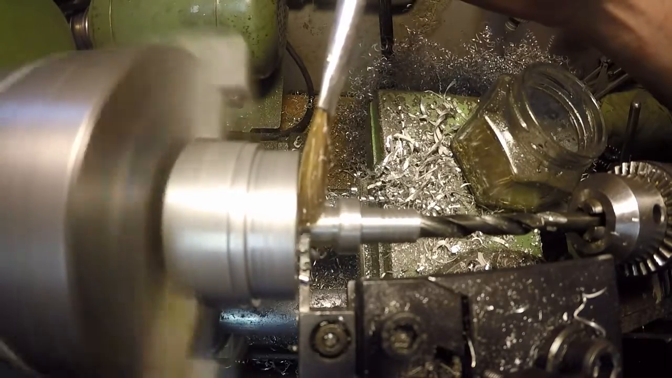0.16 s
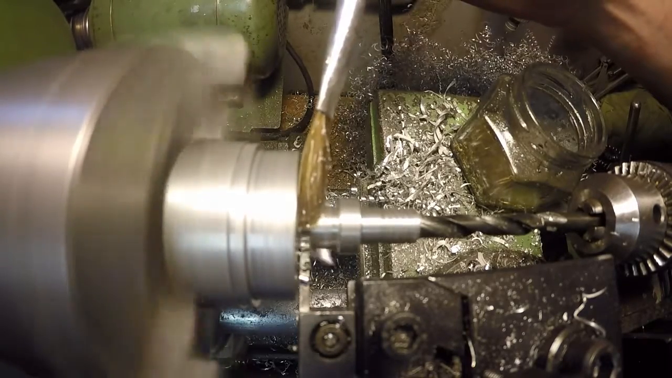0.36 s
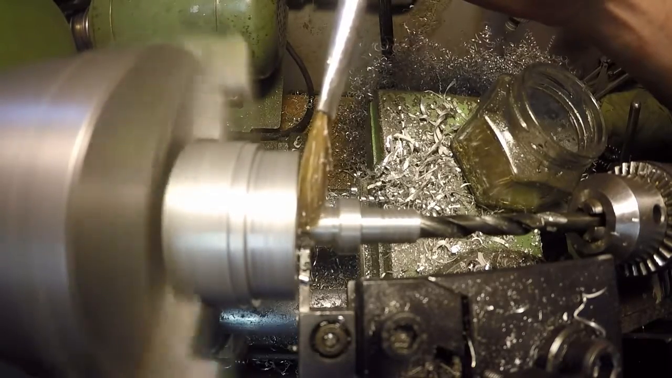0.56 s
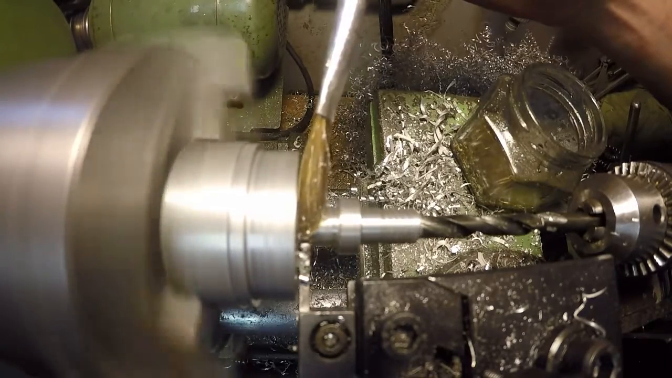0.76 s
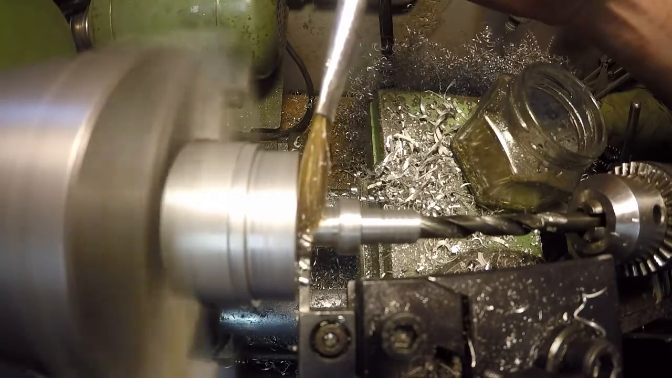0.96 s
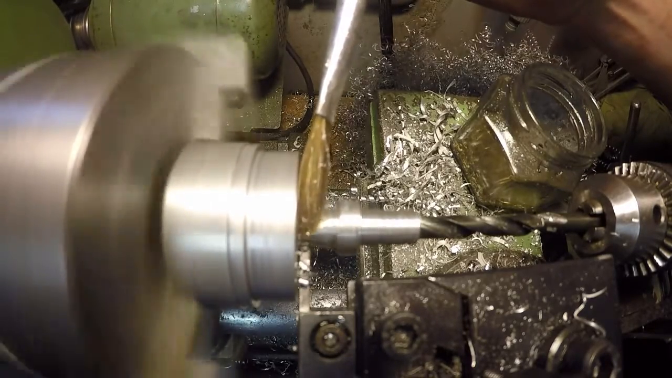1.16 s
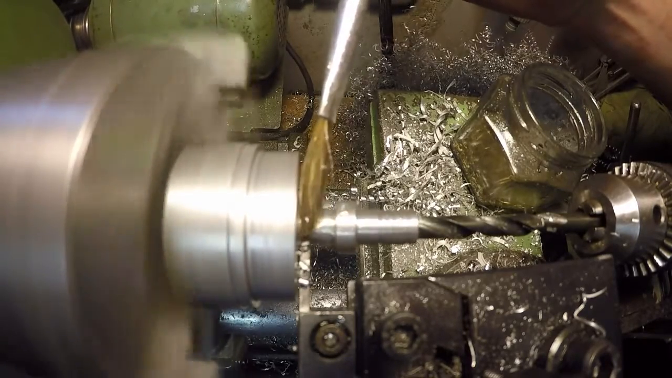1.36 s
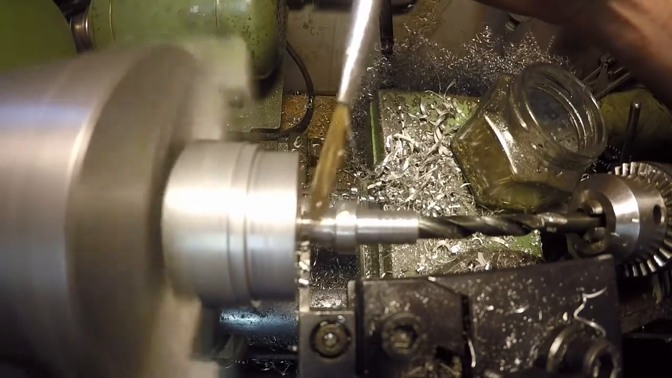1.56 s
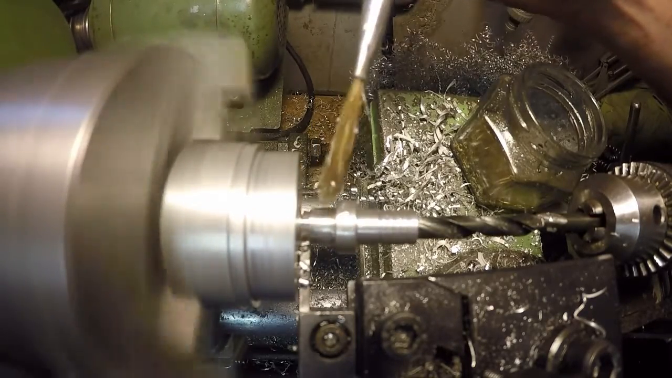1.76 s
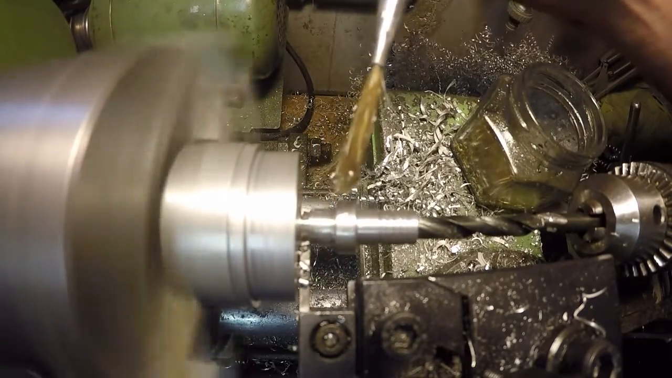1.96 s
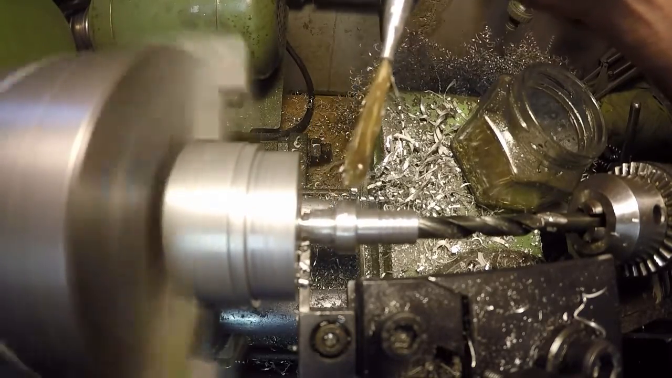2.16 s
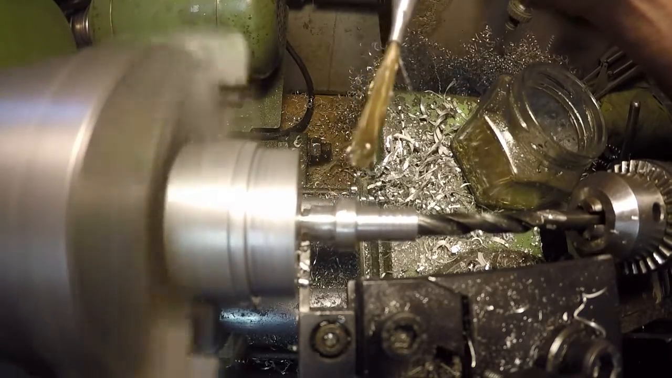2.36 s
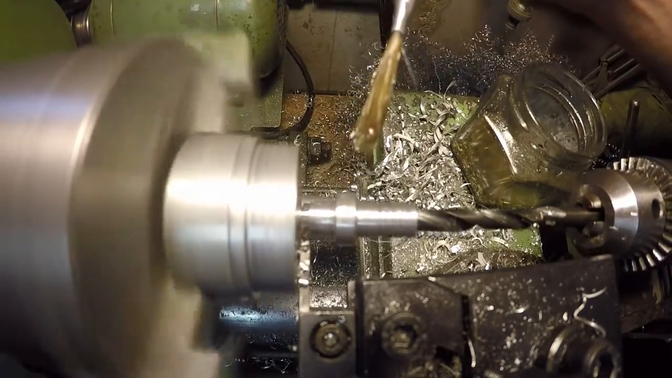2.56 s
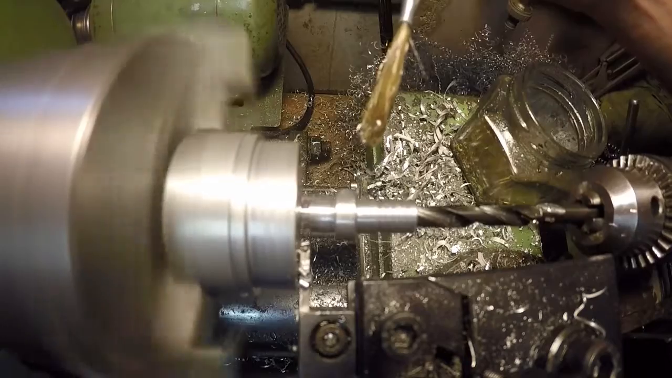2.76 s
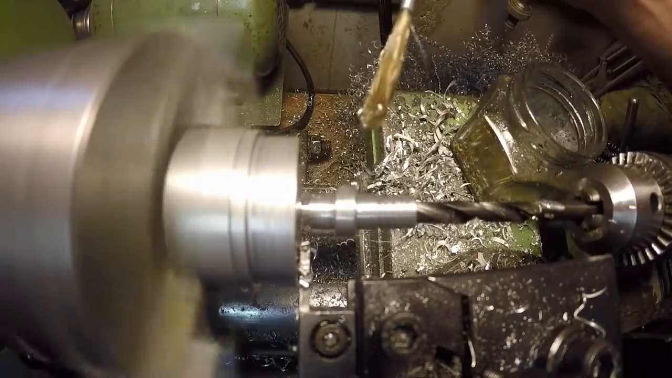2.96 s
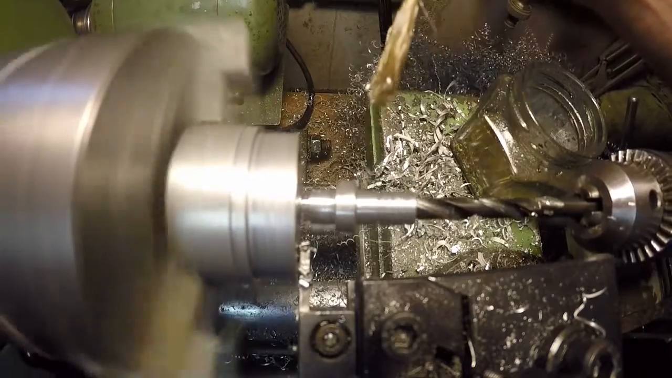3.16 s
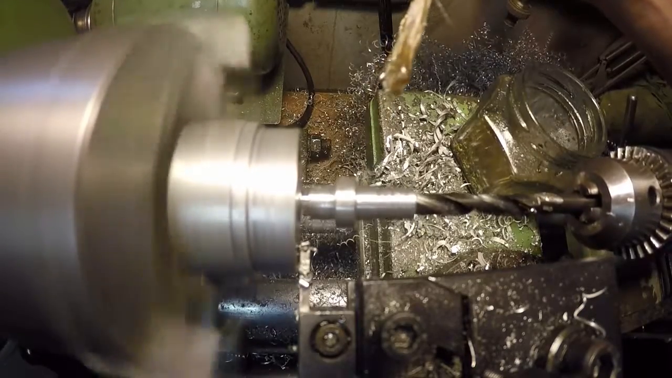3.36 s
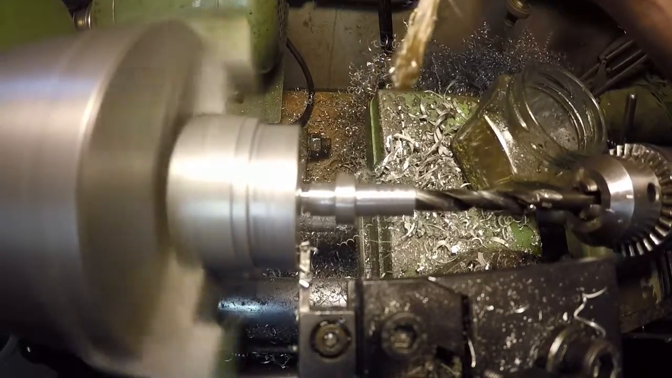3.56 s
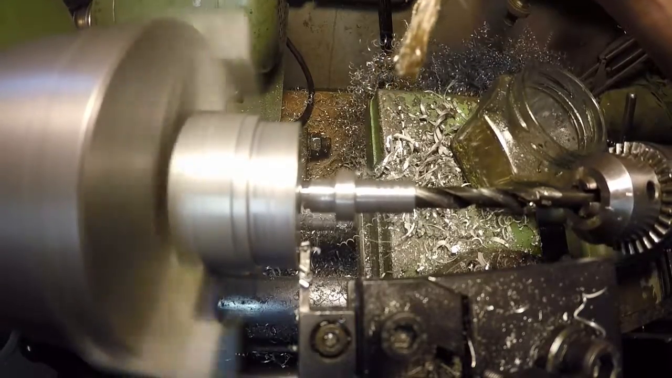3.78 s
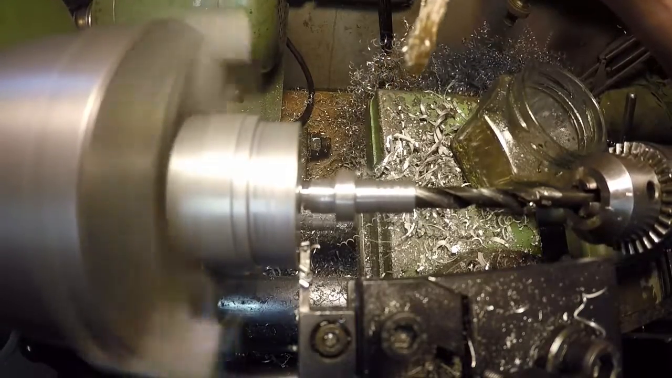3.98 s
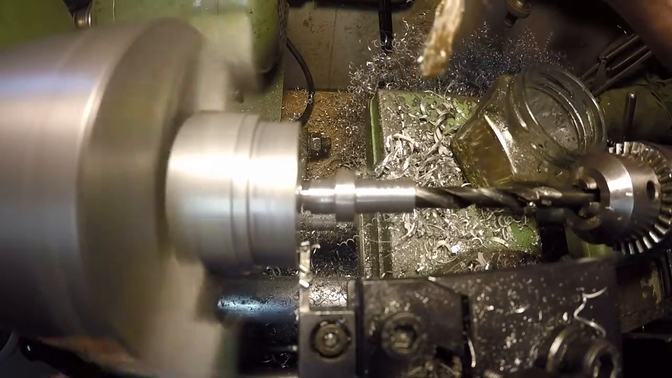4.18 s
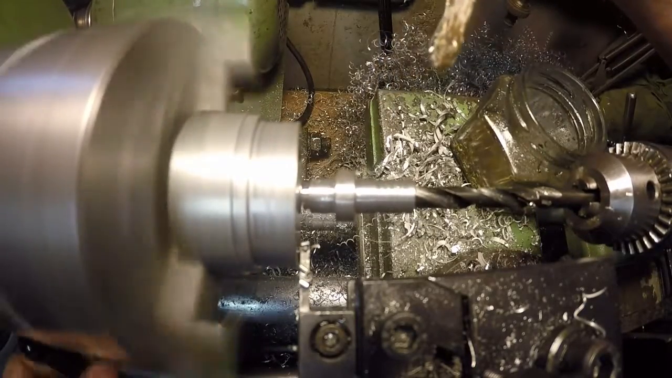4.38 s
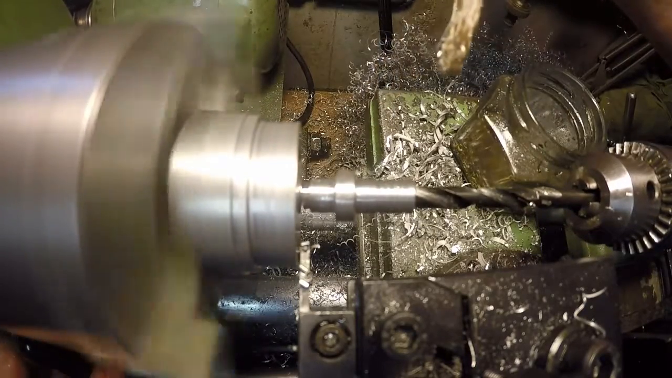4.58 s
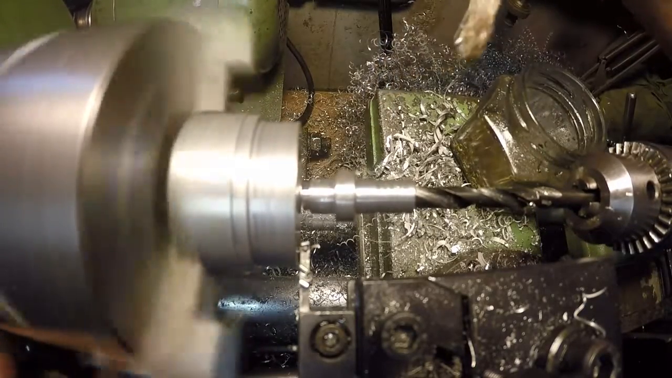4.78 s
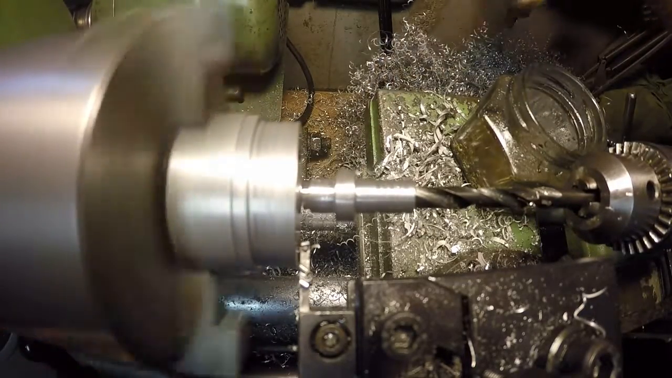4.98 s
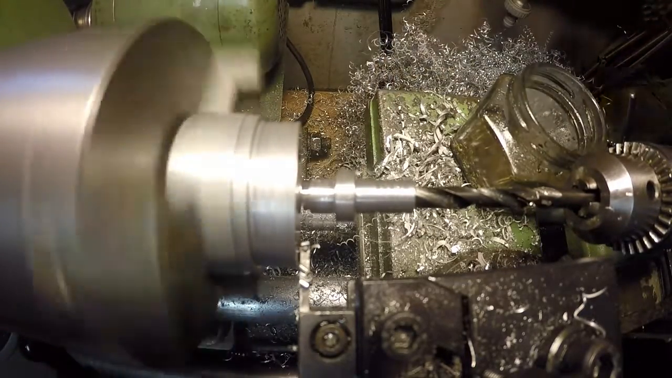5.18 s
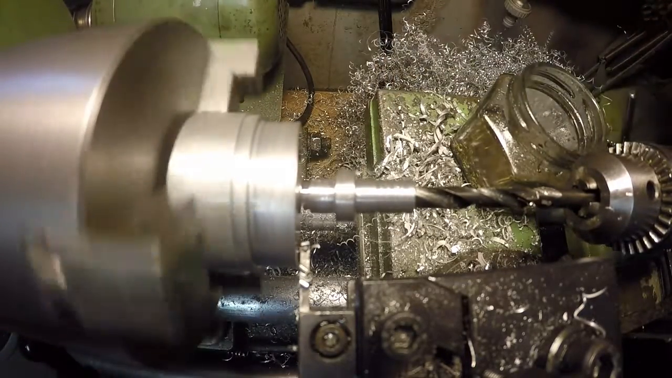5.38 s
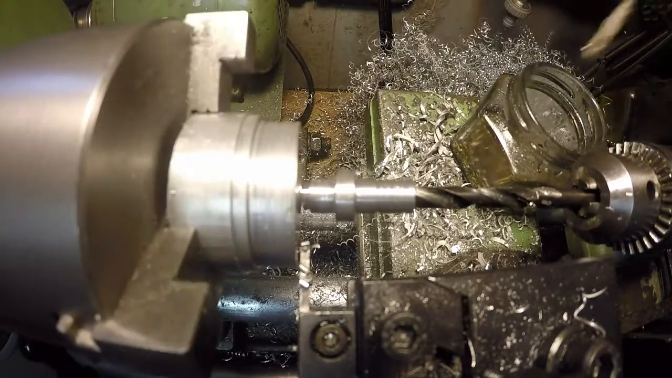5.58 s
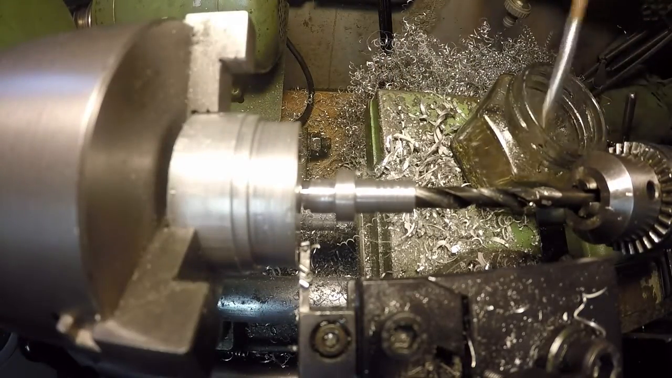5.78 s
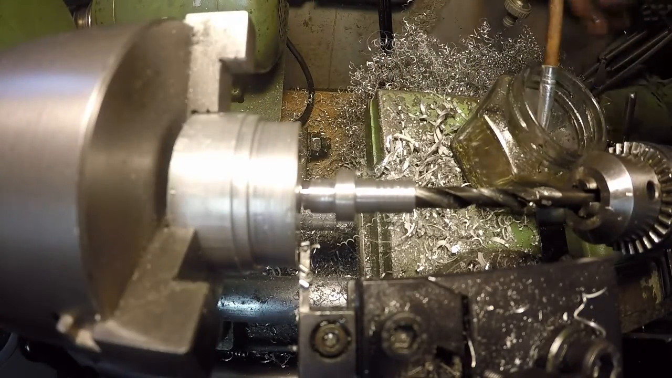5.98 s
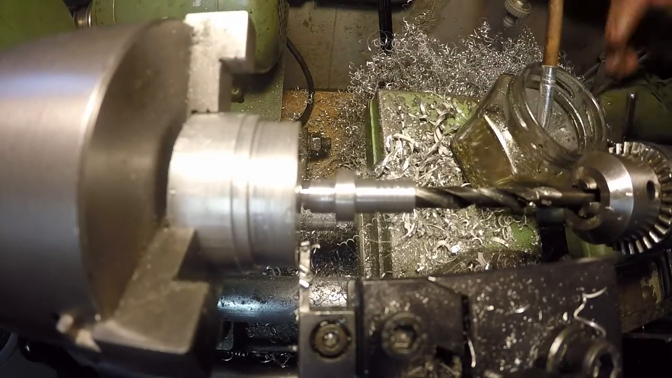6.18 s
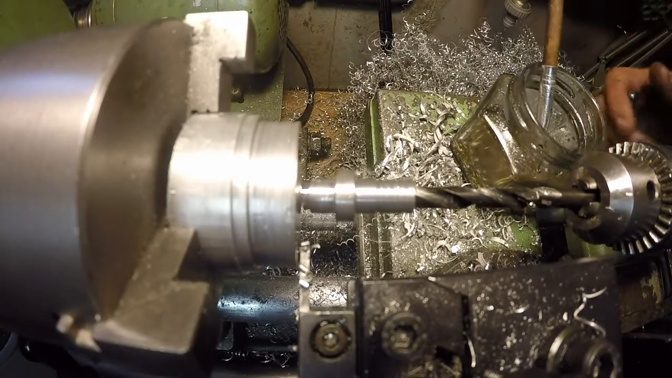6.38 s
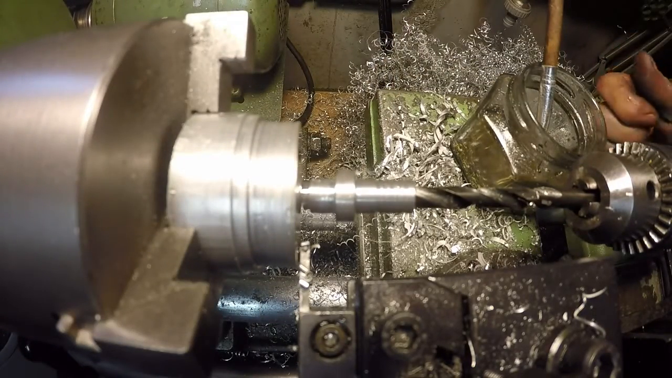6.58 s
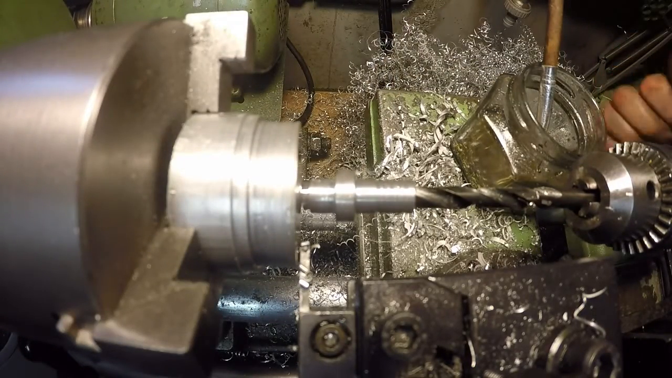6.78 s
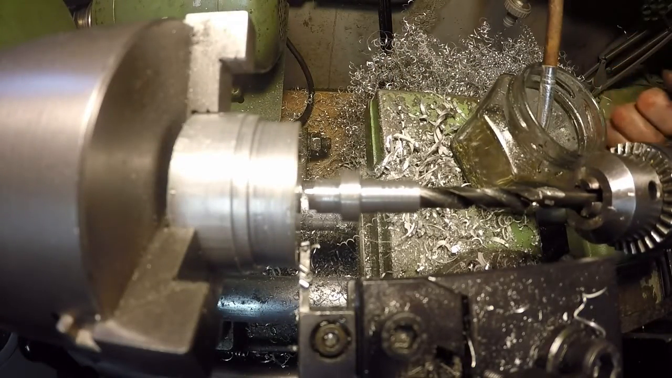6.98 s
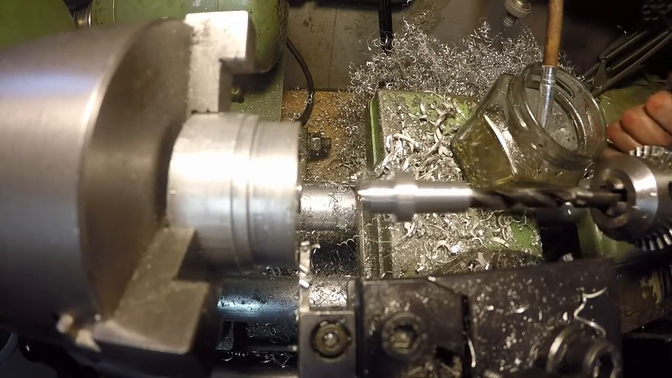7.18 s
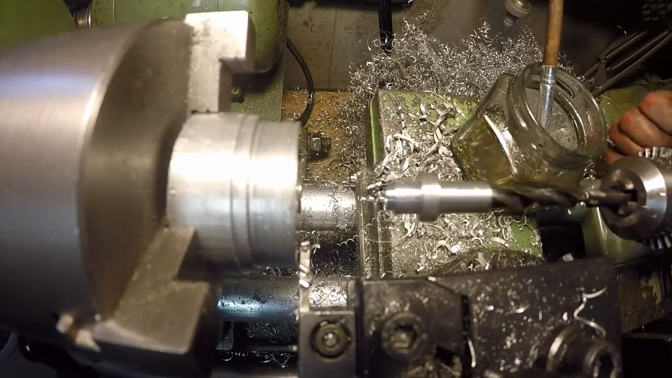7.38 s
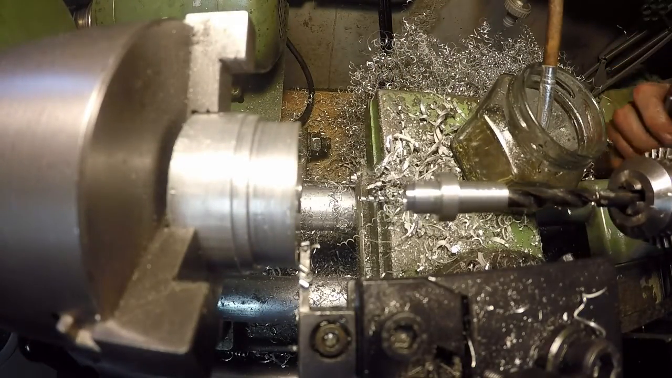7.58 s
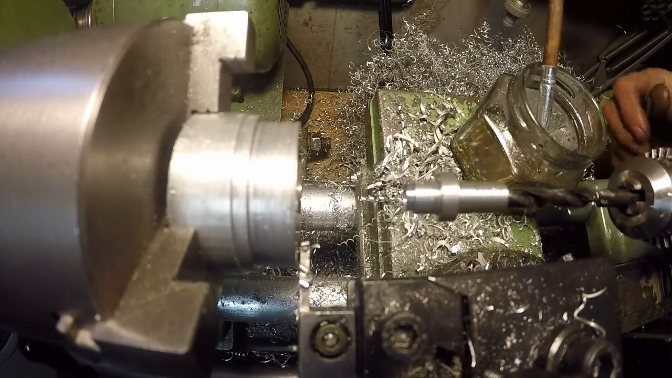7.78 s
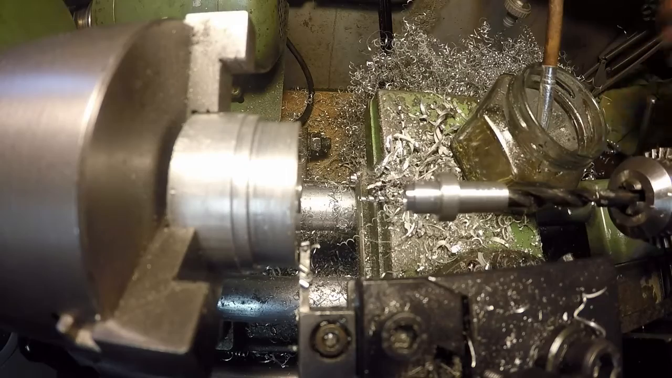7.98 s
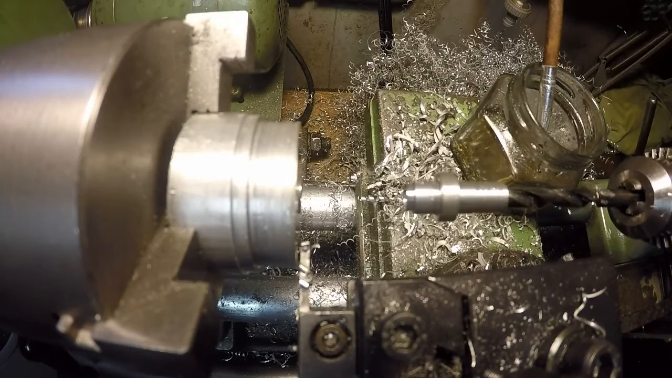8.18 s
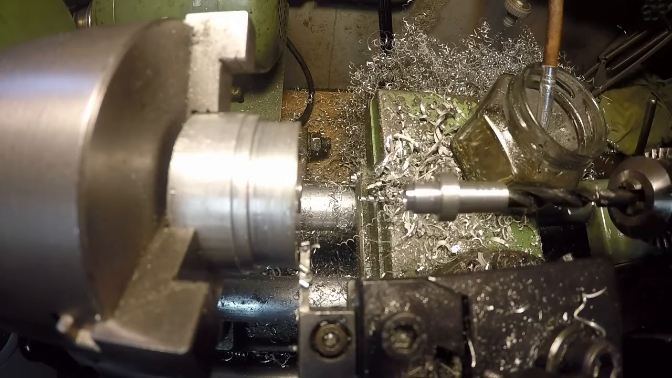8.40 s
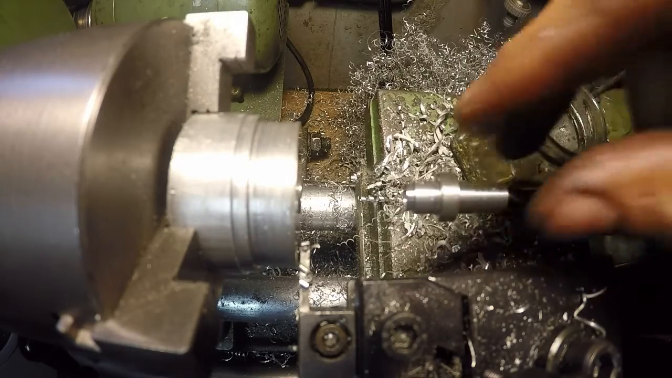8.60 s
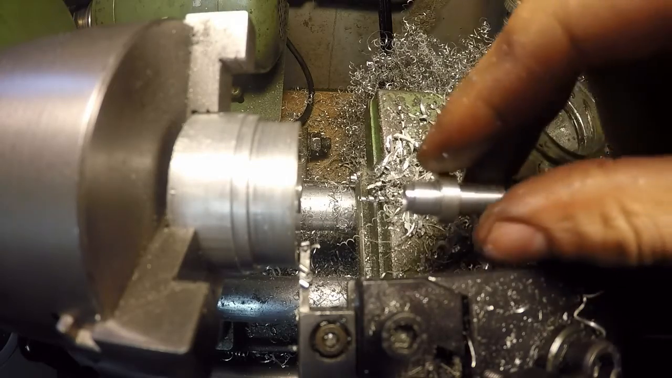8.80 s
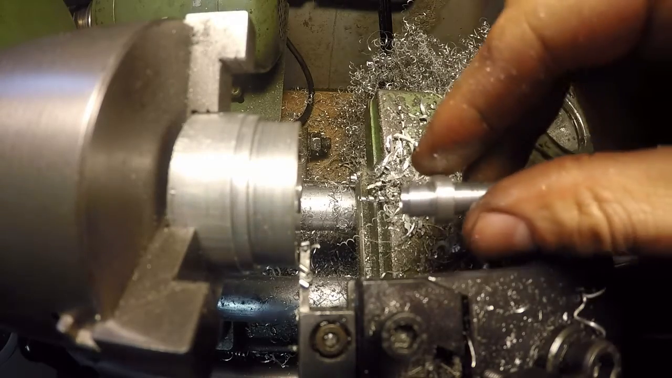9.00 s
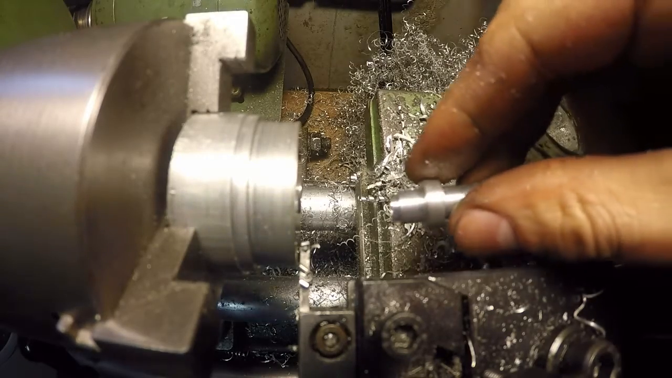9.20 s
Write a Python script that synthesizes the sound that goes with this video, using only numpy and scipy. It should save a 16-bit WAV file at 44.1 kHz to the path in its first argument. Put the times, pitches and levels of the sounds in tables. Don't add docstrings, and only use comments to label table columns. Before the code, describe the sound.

Close up in a small workshop, a lathe runs with a rough, cyclic gear clatter and bearing swish while a drill cuts metal. The bit grabs, chatters and breaks through with a knock; the gears run on. A switch clacks, the spindle coasts down with dry squeaks and stops. A brush clinks into a glass jar, a lever knocks hard, the tailstock scrapes back, and fingers tap and rub metal.

```python
import sys
import numpy as np
from scipy import signal
from scipy.fft import rfft, irfft
from scipy.io import wavfile
from scipy.ndimage import uniform_filter1d

SR = 44100
rng = np.random.default_rng(int(sys.argv[2]) if len(sys.argv) > 2 else 0)


def wav_out(sig):
    wavfile.write(sys.argv[1], SR, np.round(np.clip(np.atleast_2d(sig).T, -1, 1) * 32767).astype(np.int16))


def amplitude_ratio(level_db):
    exponent = np.asarray(level_db, float) / 20
    return 10 ** exponent


N = 407484
T = np.arange(N) / SR
HZ = np.arange(N // 2 + 1) * SR / N
SPINDLE_HZ = 5.788
POWER_OFF_S = 4.58, 4.69


def level(x, db=0):
    return x * amplitude_ratio(db) / np.sqrt(np.mean(x ** 2))


def steady(x):
    return x / np.sqrt(uniform_filter1d(x ** 2, SR // 4) + 1e-12)


def curve(rows, off=-120):
    s, *columns = np.transpose(rows)
    return [np.interp(T, s, c, left=off, right=off) for c in columns]


def body(modes, hz, order=1):
    total = 0
    for k, (mode_hz, width_hz, db) in enumerate(modes):
        resonance = 1 / (1 + 1j * (hz - mode_hz * mode_hz / np.maximum(hz, 1)) / width_hz)
        total = total + (-1) ** k * amplitude_ratio(db) * resonance ** order
    return total


def through(x, modes, order=1):
    return irfft(rfft(x) * body(modes, HZ, order), N)


def coloured(points):
    hz, db = np.transpose(points)
    gain_db = np.interp(np.log(HZ + 1), np.log(hz), db, left=-90, right=-90)
    return level(irfft(rfft(rng.standard_normal(N)) * amplitude_ratio(gain_db), N))


def walk(rate_hz, gain_db=None):
    hold = int(SR / rate_hz / 32)
    held = np.repeat(rng.standard_normal(N // hold // 32 + 2), hold)
    slow = 1.28 * uniform_filter1d(uniform_filter1d(held, hold), hold)
    return np.interp(T, np.arange(len(slow)) * 32 / SR, slow if gain_db is None else amplitude_ratio(gain_db * slow))


def grit(rough_db):
    return level(rng.standard_normal(N) * amplitude_ratio(rough_db * rng.exponential(size=N)))


# frequency in Hz, level in dB per Hz.
ROOM = [(59, -38), (100, 1), (647, -11.5), (1700, -18.5), (2050, -18), (2810, -17.5), (3050, -18.5),
        (4850, -20), (7850, -26), (15000, -31.5)]
ROOM_DB = -61.5
# time in seconds, level in dB.
JOLTS = [(5.15, -48), (5.4, -52), (5.66, -60), (5.8, -56), (5.93, -59), (6.25, -61), (6.4, -43), (6.8, -48),
         (6.92, -53), (7.1, -59), (7.55, -48), (7.8, -56), (7.97, -56.5), (8.25, -59), (8.7, -58.5),
         (8.95, -59)]
ROCK_DB, ROCK_RISE_S, ROCK_FALL_S = -63.5, 0.027, .12


def workshop():
    rock = steady(through(grit(0), [(34, 22, -4.0), (66.0, 25, -7.5)], order=2))
    sway = amplitude_ratio(ROCK_DB + 3.0 * walk(6.5))
    for s, db in JOLTS:
        sway = sway + amplitude_ratio(db) * np.exp(np.minimum((T - s) / ROCK_RISE_S, (s - T) / ROCK_FALL_S))
    return amplitude_ratio(ROOM_DB + 0.33 * walk(13.0)) * coloured(ROOM) + sway * rock


# time in seconds, pitch in Hz, level in dB.
WHISTLES = [
    [(7.77, 5800, -88), (7.85, 5680, -78), (7.885, 5810, -72), (7.91, 6050, -78), (7.97, 6500, -88)],
    [(8.08, 3650, -88), (8.13, 3850, -77), (8.2, 4100, -79), (8.3, 4000, -77), (8.36, 4050, -88)],
    [(8.365, 6910, -88), (8.385, 6740, -74), (8.47, 6050, -76), (8.495, 5960, -69), (8.525, 6020, -70),
     (8.555, 5800, -69), (8.585, 5820, -64), (8.615, 5600, -62), (8.645, 4950, -80)],
]


def whistles():
    out, flutter = 0, walk(60)
    for rows in WHISTLES:
        s, hz, db = np.transpose(rows)
        pitch_hz = np.interp(T, s, hz) * (1 + .003 * flutter)
        gain = np.sqrt(2) * amplitude_ratio(np.interp(T, s, db, left=-140, right=-140) + 1.5 * flutter)
        out = out + gain * np.sin(2 * np.pi * np.cumsum(pitch_hz) / SR)
    return out


# strongest moment, swell and ease in seconds, level in dB, centre in Hz.
RUSTLES = [(8.12, .02, .05, -66, 4500), (8.19, .04, .06, -61, 3000), (8.47, .02, .04, -62, 2600),
           (8.952, .008, .03, -52, 2600), (8.98, .025, .07, -53.5, 2400), (9.097, .003, .015, -51, 2500),
           (8.838, .004, .015, -60, 3500), (8.92, .005, .015, -58, 3800)]


def rustles():
    out = np.zeros(N + SR)
    t = np.arange(8192) / SR
    hz = np.arange(len(t) // 2 + 1) * SR / len(t)
    for s, swell_s, ease_s, db, centre_hz in RUSTLES:
        fibres = rng.standard_normal(len(t)) * amplitude_ratio(1.8 * rng.exponential(size=len(t)))
        response = body([(centre_hz, 0.9 * centre_hz, 0)], hz, order=2)
        swish = level(irfft(rfft(fibres) * response), db)
        envelope = np.interp(t, [0, swell_s, swell_s + ease_s], [0, 1, 0])
        out[int((s - swell_s) * SR):][:len(t)] += swish * envelope
    return out[:N]


# strongest moment, swell and ease in seconds, level in dB,
# brightness in dB per octave.
SLIDES = [(6.4, .012, 0.093, -52, -1), (6.58, .04, .1, -61, -1), (6.79, 0.13, 0.029, -51, -0.5),
          (7.01, 0.066, 0.083, -44.5, 1), (7.098, 0.056, 0.15, -45, 3.5), (7.22, 0.16, .14, -43.5, 2.5),
          (7.519, 0.13, 0.017, -43.5, 3.5), (7.6, .03, 0.11, -64, -8), (7.83, 0.066, 0.071, -56.5, 0),
          (8.19, .09, .06, -61, 1), (8.47, 0.033, 0.038, -62, 2), (8.78, 0.015, .07, -45, -3),
          (8.85, 0.044, .06, -46, -2), (8.92, 0.033, 0.041, -39.5, -1), (8.97, 0.025, 0.081, -49, 5),
          (9.09, 0.028, 0.07, -38.5, -4), (9.21, 0.099, 0.14, -43.5, 0.5)]
# level in dB, pitch in octaves up.
SLIDE_SHARE = [(-1, -0.5), (-6.5, 1.5), (-20, 2.5)]
# frequency in Hz, width in Hz, level in dB.
TAIL_MID = [(710, 190, -4.5), (835, 61, 2.5), (985, 160, -3), (1228, 143, -0.5)]
TAIL_TOP = [(1580, 160, -2), (1990, 210, 3), (2380, 220, 2), (2740, 200, -7), (3270, 600, -14),
            (4400, 700, -12.5)]


def slides():
    slips = grit(1.9) * amplitude_ratio(1.8 * walk(40))
    pushes = np.array([np.interp(T - s, [-swell_s, 0, ease_s], [0, 1, 0])
                       for s, swell_s, ease_s, *_ in SLIDES]) ** 1.16
    db, bright = np.transpose(SLIDES)[3:]
    out = 0
    for modes, (share_db, octaves) in zip((BED_LOW, TAIL_MID, TAIL_TOP), SLIDE_SHARE):
        strength = amplitude_ratio(share_db + db + bright * octaves) @ pushes
        out = out + strength * level(through(slips, modes, order=2))
    return out


KNOCK_HZ = [400, 700, 1100, 2300, 6000, 13000]
STRUCK = {"drill": [-6.5, 2.5, 0, -21, -22, -34], "switch": [-10, -18.5, -0.5, -22, -24, -36], "lock": [-6,
          -0.5, -2, -7, -19, -44], "gears": [-2, -1.5, -34, -36, -46.5, -66], "tailstock": [0, -8, -18, -23,
          -36, -56], "part": [-5, 3.5, -21, -20, -39, -54], "jar": [-9, -20, -5, -28, -19, -27]}
BLOWS = {"drill": [(1.19, -20, 4.5), (1.204, -16, 3)], "switch": [(4.659, -17.5, 5.5)],
         "lock": [(6.811, -11, -0.5), (6.825, -27, -1)], "jar": [(5.853, -13, -1.5), (5.865, -22, -3),
         (5.877, -27.5, -2)], "gears": [(5.088, -14.5, 2), (5.171, -16, 0.5), (5.495, -38, -5),
         (5.525, -39, -3), (5.575, -47, 0)], "tailstock": [(6.371, -28, 0), (6.455, -45, 3.5),
         (6.563, -52, -4), (6.777, -44, 3), (6.904, -32, 3), (7.093, -33, -4), (7.528, -18, -4.5),
         (7.895, -45, 0)], "part": [(8.768, -30, 1), (8.781, -31, -1), (8.833, -28.5, 3), (8.864, -34, 2),
         (8.9, -26.5, 2.5), (8.917, -27.5, 3.5), (8.967, -29, 1), (8.982, -29, -4), (9.07, -34, -1),
         (9.083, -30, 0), (9.096, -28, 3), (9.139, -28.5, -1), (9.189, -35, 3)]}
CLACK = {"drill": (.006, .08, .02), "switch": (.011, .1, .025), "lock": (.005, .2, .016),
         "gears": (.006, .08, .02), "tailstock": (0.0065, .08, .02), "part": (.004, .1, .015),
         "jar": (.003, .3, .014)}
# frequency in Hz, level in dB, t60 in seconds.
RING = [(296, -10, 0.15), (376.3, -0.5, 0.14), (408, -2, 0.12), (530, -8.5, 0.048), (635, -3.5, .08),
        (714, 1.5, 0.073), (835, -2, 0.11), (950, 5.5, 0.04), (1055, -1.5, 0.072), (1242, -7, 0.038),
        (1580, -9.5, 0.04), (2020, -2.5, 0.033), (2350, -2.5, 0.048)]
# time in seconds, frequency in Hz, level in dB, t60 in seconds.
PINGS = [(5.855, 6740, -30, 0.08), (5.854, 4300, -51, 0.06), (7.897, 655, -38.5, 0.17),
         (4.6, 171, -35.5, 0.3), (6.385, 176, -43, .3), (7.53, 630, -21.5, 0.079),
         (6.813, 1550, -19.5, 0.047), (6.814, 1940, -12, .03), (6.814, 2270, -16, 0.035),
         (5.854, 1080, -17, .06), (6.814, 3000, -33, .06), (6.814, 3640, -34, .05), (6.814, 4170, -38, .06),
         (1.203, 828, -11, .1), (5.866, 6760, -34, .05), (5.856, 4900, -46, .09), (5.856, 3030, -44, .054)]
RISE_S, SOFT_RISE_S = .001, 0.0036


def knocks():
    out, t = np.zeros(N + SR), np.arange(SR // 4) / SR
    ring_hz, ring_db, t60_s = np.transpose(RING)
    decay = np.exp(-np.log(1000) * t[:, None] / t60_s)
    hz = np.arange(len(t) // 2 + 1) * SR / len(t)
    upper = amplitude_ratio(-0.5) + amplitude_ratio(-2.5) * abs(body(BED_TOP, hz))
    octaves = np.log2(np.array(KNOCK_HZ) / 700)
    for thing, blows in BLOWS.items():
        rise_s = SOFT_RISE_S if thing == "part" else RISE_S
        crack_s, share, rattle_s = CLACK[thing]
        for s, db, bright in blows:
            band_db = db + bright * octaves + STRUCK[thing]
            gain, tune, phase = rng.standard_normal((3, len(RING)))
            blow_db = np.interp(np.log(ring_hz), np.log(KNOCK_HZ), band_db)
            size = amplitude_ratio(blow_db + ring_db - 3.0 + 1.1 * gain)
            angle = 2 * np.pi * np.outer(t, ring_hz * (1 + 0.011 * tune)) + np.pi * (phase > 0)
            rings = (np.sin(angle) * decay) @ size * (0.5 + 0.42 * np.exp(-t / 0.041))
            clack_db = np.interp(np.log(hz + 1), np.log(np.r_[200, KNOCK_HZ]), np.r_[band_db[0] - 35, band_db])
            clack = irfft(rfft(rng.standard_normal(len(t))) * upper * amplitude_ratio(clack_db), len(t))
            clack *= np.exp(-t / crack_s) + share * np.exp(-t / rattle_s)
            knock = (rings + amplitude_ratio(1.0) * clack) * (1 - np.exp(-t / rise_s))
            out[int((s + .0015) * SR):][:len(t)] += knock
    for s, ping_hz, db, ping_t60_s in PINGS:
        envelope = np.exp(-np.log(1000) * t / ping_t60_s) * (1 - np.exp(-t / 0.0014))
        out[int(s * SR):][:len(t)] += amplitude_ratio(db) * np.sin(2 * np.pi * ping_hz * t) * envelope
    return out[:N]


LAWS = {"low": (-27, .5, 60, 0.95, 0.8), "mid": (-17.5, 0.0454, 53.5, 1.5, 0.44),
        "top": (-29.5, 0.05, 46, 0.77, 0.5), "shake": (-30.5, 0.32, 41, .5, 0),
        "whirr": (-41.5, .02, 6, 1.7, 1), "hiss": (-53, 0, 8, 1.1, .3), "dry": (-43, 0.48, 33, 1.5, 0)}
STICK_S, STICK_LENGTH_S = 5.54, .08


def law(name, speed):
    full_db, knee, fade_db, bend, share = LAWS[name]
    load_db = np.interp(T, *np.transpose(FEED)) * (T < THROUGH_S)
    stuck = np.clip((T - STICK_S) / STICK_LENGTH_S, 0, 2)
    return full_db + share * load_db - fade_db * np.clip(1 - speed - knee, 0, 1) ** bend - 30 * stuck


# frequency in Hz, width in Hz, level in dB.
WHIRR = [(3900, 380, -1.5), (4470, 570, 3), (5720, 860, -10)]
COAST = [(3900, 230, 1), (4700, 200, -4), (5180, 210, -4.5), (5850, 290, -0.5), (7460, 2700, -13.5),
         (10400, 2400, -28.5)]
# frequency in Hz, level in dB per Hz.
HISS = [(2940, -46), (5000, -1), (5790, -1.5), (6300, -2.5), (8300, -9), (10900, -20.5), (13000, -22.5),
        (15000, -25)]
# time in
# seconds, pitch in Hz, fall in Hz, level in dB, length in seconds.
SQUEAKS = [(4.72, 4260, 200, -39, 0.04), (4.798, 6680, 302, -40, 0.037), (4.85, 5690, 100, -38, 0.037),
           (4.90, 3900, 100, -36, 0.057), (4.9, 5850, 100, -49, .05), (4.92, 7000, 300, -47, .04),
           (4.957, 5350, 250, -41, 0.073), (4.996, 4700, 200, -45, 0.056), (5.116, 3900, 100, -34.5, 0.061),
           (5.13, 7700, 300, -48, .04), (5.2, 5500, 353, -44, 0.066), (5.28, 3960, 150, -46, 0.065),
           (5.35, 4000, 150, -47, .07)]
# time in seconds, level in dB.
SLOT_SONG = [(5.15, -72), (5.22, -55), (5.27, -57), (5.33, -61), (5.38, -80)]
SLOT_HZ = 7150
SLIP, RUB_TURN = .9857, .007


def bearings(turns, speed):
    whirr_db, hiss_db, dry_db = (law(name, speed) for name in ("whirr", "hiss", "dry"))
    rub = np.exp(2.2 * (np.cos(2 * np.pi * (SLIP * turns + RUB_TURN)) - 1))
    whirr = level(through(grit(2.43), WHIRR, order=2) * (1 + 0.28 * rub))
    chirp = level(through(grit(2.5), [(3900, 130, 0)], order=2))
    whirr += 1.15 * rub ** 4 * chirp
    hiss = level(coloured(HISS) * (1 + 1.3 * rub) * amplitude_ratio(1.0 * walk(25)))
    fan_air = level(through(grit(0), [(11330, 6900, 0)], order=2))
    hiss += amplitude_ratio(-18.5) * fan_air
    coast = level(through(grit(1.9) * amplitude_ratio(2.4 * walk(25)), COAST))
    cutting_db = np.interp(T, [1.17, 1.22], [3.0, 0])
    free = np.interp(T, [4.66, 4.9], [0, 1])
    out = amplitude_ratio(whirr_db + cutting_db) * (1 - free) * whirr
    out += amplitude_ratio(dry_db) * free * coast
    out += amplitude_ratio(hiss_db + 6.5) * (1 - 0.77 * free) * hiss
    waver = 2.2 * walk(180)
    song_gain = amplitude_ratio(curve(SLOT_SONG)[0] + 3.0 * walk(30))
    out += song_gain * np.sin(2 * np.pi * SLOT_HZ / SPINDLE_HZ * turns + .8 * waver)
    for s, hz, fall_hz, db, length_s in SQUEAKS:
        t = np.arange(int(length_s * SR)) / SR
        at = slice(int(s * SR), int(s * SR) + len(t))
        angle = 2 * np.pi * (hz - fall_hz * t / length_s / 2) * t + waver[at]
        out[at] += amplitude_ratio(db) * np.hanning(len(t)) * np.sin(angle)
    return out


# frequency in Hz, width in Hz, level in dB.
DRILL = [(288, 51, -0.5), (1534, 225, 0.5), (3346, 270, -8), (4137, 250, 0), (4430, 380, -12),
         (4700, 200, -3), (5160, 130, -13), (5720, 200, -7), (6070, 250, -8), (7040, 330, -15.5),
         (7390, 210, -10.5), (7670, 200, -27), (8900, 990, -38), (12400, 3100, -41)]
# time in seconds, load in dB.
FEED = [
    (0, -0.5),
    (.1, -0.5),
    (.25, 4),
    (.28, -2.5),
    (.44, 3.5),
    (.485, -2),
    (.71, 3),
    (1.05, 0),
    (1.07, -2),
]
# time in seconds, level in dB, hold in seconds.
GRABS = [
    (0.99, -19.5, .008),
    (1.063, -16.5, 0.0076),
    (1.132, -14, 0.027),
]
GRAB_RISE_DB_PER_S, GRAB_FALL_DB_PER_S = 499.5, 499
CUT_DB, THROUGH_S, THROUGH_DB_PER_S = -27.5, 1.154, 259.5


def drill():
    tear = level(through(grit(2.7) * amplitude_ratio(1.5 * walk(45)), DRILL, order=2))
    feed_db = np.interp(T, *np.transpose(FEED), right=-1.5)
    cut_db = CUT_DB + feed_db - THROUGH_DB_PER_S * np.clip(T - THROUGH_S, 0, 1)
    chatter = np.sqrt(2) * np.sin(2 * np.pi * (368 * T + 0.16 * walk(33)))
    grip = 0
    for s, db, hold_s in GRABS:
        away_db = np.maximum(GRAB_RISE_DB_PER_S * (s - T), GRAB_FALL_DB_PER_S * (T - s - hold_s))
        grip = grip + amplitude_ratio(db - away_db.clip(0))
    return amplitude_ratio(cut_db) * tear + grip * chatter


# frequency in Hz, dB per s, dB per s squared.
DRIFT = [(640.6, 1.0, -.2), (694.4, -1.1, -.2), (721.4, 2.5, -.2), (974.4, -.3, .2), (1012, -.5, .3),
         (1093, -1, .3), (1136, -1.5, .4), (1174, 0.1, .2), (1217, 3, -.2), (1906, .5, .3), (1986, .5, .3),
         (2347, -1, -.3), (2670, -1.5, -.5), (2762, -1, -.3), (2842, -1, .3)]


def tooth(hz, turns):
    driven = int(POWER_OFF_S[1] * SR)
    t, turns = T[:driven], turns[:driven]
    once, twice = np.exp(2j * np.pi * turns), np.exp(4j * np.pi * turns)
    loose = np.interp(t, [1.1, 1.3], [1.5, 1])
    age_s = np.clip(t, 1.2, 4.6) - 2.0
    for f in hz:
        a, b, c, d = np.exp(2j * np.pi * rng.random(4))
        wobble = .25 * (a * once).imag + .45 * (b * twice).imag
        wobble += .7 * walk(5)[:driven] * loose * max(f / 1300, 1)
        drift_db = sum(age_s * (db + bend_db * age_s) for near, db, bend_db in DRIFT if abs(near - f) < 10)
        swell = (1 + 0.052 * (c * once).imag) * walk(3.51, gain_db=2.9)[:driven] ** loose * amplitude_ratio(drift_db)
        tone = np.sin(2 * np.pi * round(f / SPINDLE_HZ) * turns + wobble + np.angle(d))
        yield np.pad(swell * tone, (0, N - driven))


def clatter(turns, keep, size):
    fresh = rng.standard_normal((int(turns[-1]) + 2, size))
    renew = np.sqrt(1 - keep ** 2)
    wheel = signal.lfilter([renew], [1, -keep], fresh, axis=0, zi=keep * fresh[-1:])[0].ravel()
    return np.interp(turns * size, np.arange(len(wheel)), wheel)


# frequency in Hz at full speed, level in dB rms.
TEETH = [(366.1, -36), (398.4, -34), (441.4, -42.5), (479.1, -40.5), (570.6, -39), (640.6, -33),
         (694.4, -30), (721.4, -30.5), (807.5, -37.5), (850.6, -40), (893.6, -40), (931.3, -40.5),
         (974.4, -34.5), (1012, -29), (1093, -34.5), (1136, -29), (1174, -32.5), (1217, -38.5), (1254, -46),
         (1292, -42), (1739, -47.5), (1906, -48), (1986, -43.5), (2067, -50.5), (2347, -44), (2632, -58.5),
         (2670, -46.5), (2762, -48), (2842, -48.5), (2918, -51)]
# frequency in Hz, level in dB rms.
SHAKE = [
    (29, -44.5),
    (50.9, -38.5),
    (79.5, -44.5),
]
# frequency in Hz, width in Hz, level in dB.
BED_LOW = [(320.4, 30, -21.5), (368.3, 24.7, 1.5), (414.6, 25.2, 1.5), (434, 25.6, -4.5), (494.4, 49, -9)]
BED = [(590, 94, 0), (646, 45, 3), (704, 42, 3), (797, 90, -5), (892, 90, -8.5), (1020, 56.5, -0.5),
       (1084, 39.6, -5), (1122, 71, -3.5), (1231.2, 56, -2.5)]
BED_TOP = [(1558, 460, -5.5), (1747, 85, 2.5), (1913, 82, 4), (2395, 78, 3.5), (2644, 179, -3),
           (2965, 240, -2), (3370, 640, -9)]
# frequency in Hz, width in Hz, depth 0-1.
NODES = [(1400, 140, 0.22), (2175, 99, 0.7), (2544, 79.8, .6)]
# rows of frequency in Hz, level in dB per Hz; then overall level in dB.
MOTOR_AIR = [(53, -30.5), (90, -4), (108, -19.5), (182, -10), (242, -21), (330, -2), (430, -41.5),
             (730, -120)], -45
GEARING = 7
TOP_CUT_DB = 2


def gears(run, turns, speed):
    low_db, mid_db, top_db, shake_db = (law(name, speed) for name in ("low", "mid", "top", "shake"))
    top_db = top_db + TOP_CUT_DB * (T < THROUGH_S)
    rough = 0.87 * clatter(turns, keep=0.867, size=8192)
    rough += 0.29 * clatter(turns * GEARING, keep=0.867, size=2048)
    rough += .35 * grit(2.5)
    torque = np.interp(T, POWER_OFF_S, [1, 0])
    out = 0
    for modes, db, rough_db in ((BED_LOW, low_db, -1.5), (BED, mid_db, -2.5), (BED_TOP, top_db, 4.5)):
        lines = [(f, g) for f, g in TEETH if modes[0][0] - 30 < f < modes[-1][0] + 60]
        force = 0
        for (f, g), tone in zip(lines, tooth([f for f, g in lines], turns)):
            force = force + amplitude_ratio(g) / abs(body(modes, f)) * tone
        tones = torque * level(through(force, modes))
        sound = steady(tones + level(through(rough, modes), rough_db))
        out = out + walk(55, gain_db=1.6) * amplitude_ratio(db) * sound
    for hz, width_hz, depth in NODES:
        out = out - depth * signal.lfilter(*signal.iirpeak(hz, hz / width_hz, fs=SR), out)
    out = signal.sosfilt(signal.butter(3, 4500, fs=SR, output="sos"), out)
    shake = 0
    for f, g in SHAKE:
        angle = 2 * np.pi * (f * run + rng.random() + 0.17 * walk(3.2))
        shake = shake + amplitude_ratio(g + .8 * walk(4.6)) * np.sin(angle)
    shake = level(shake) + level(through(grit(0), [(50, 59, 0)], order=2), -10.0)
    air_points, air_db = MOTOR_AIR
    air = amplitude_ratio((mid_db - LAWS["mid"][0]) * 0.78 + air_db) * coloured(air_points)
    return out + amplitude_ratio(shake_db) * steady(shake) + air


# time in seconds, speed 0-1.
SPEED = [
    (0, 1),
    (4.66, 1),
    (4.8, .9),
    (5.0, .68),
    (5.2, .45),
    (5.4, 0.2),
    (5.62, 0),
    (9.24, 0.01),
]


def scene():
    speed = curve(SPEED)[0]
    run = np.cumsum(speed) / SR
    turns = run * SPINDLE_HZ
    dry = rustles() + slides() + knocks() + bearings(turns, speed) + drill() + gears(run, turns, speed)
    t = np.arange(SR // 2) / SR
    walls = rng.standard_normal(len(t)) * np.exp(-np.log(1000) * t / 0.27) * (t > .006)
    walls /= np.sqrt(np.sum(walls ** 2))
    wet = amplitude_ratio(-19.5) * signal.fftconvolve(dry, walls)[:N]
    return (dry + wet + workshop() + whistles())[None]


def low_pass(x):
    return signal.sosfilt(signal.butter(12, 15270, fs=SR, output="sos"), x)


def record(dry):
    mix = np.tanh(.8 * dry) / .8
    return low_pass(mix)


dry = scene()
out = record(dry)
wav_out(out)
```